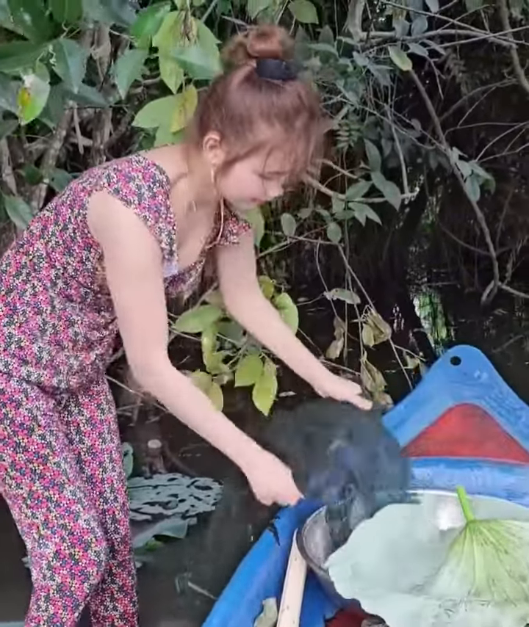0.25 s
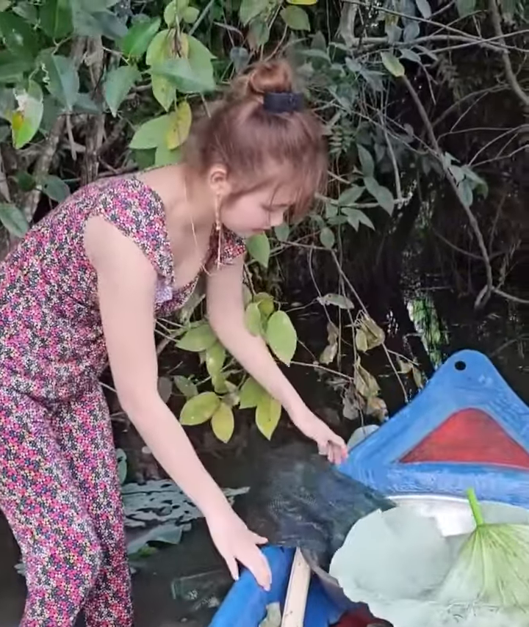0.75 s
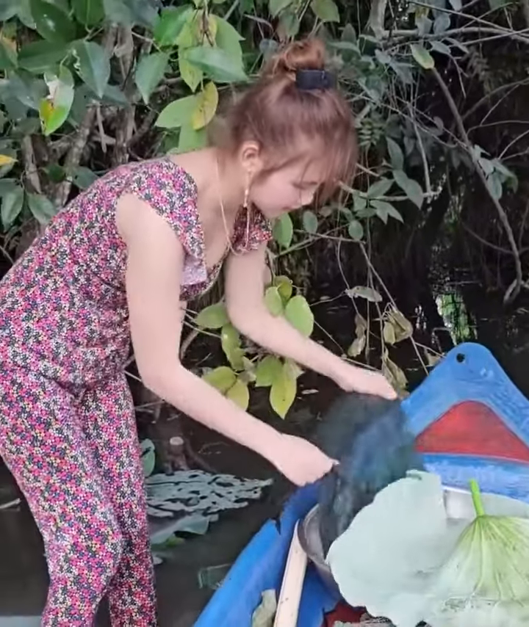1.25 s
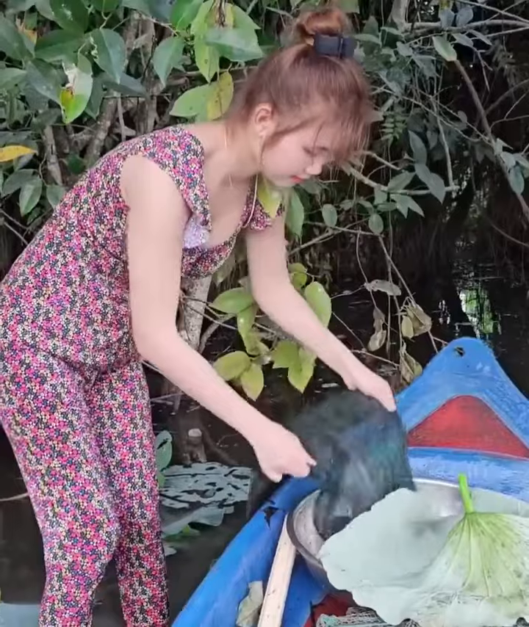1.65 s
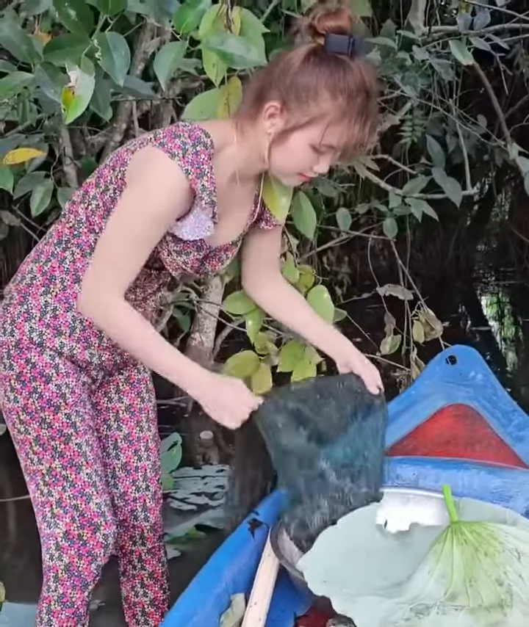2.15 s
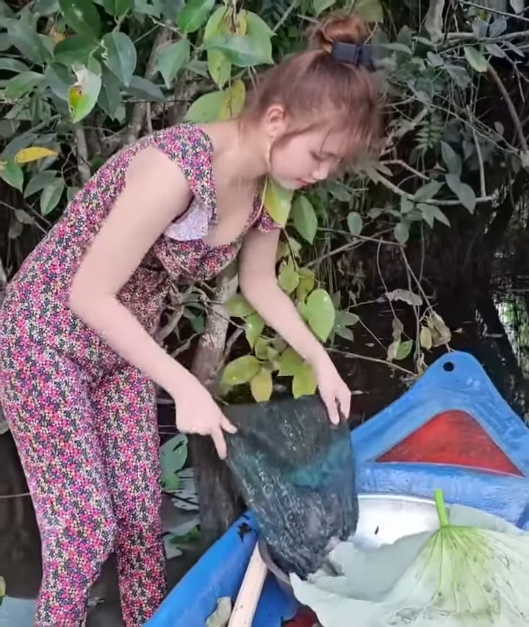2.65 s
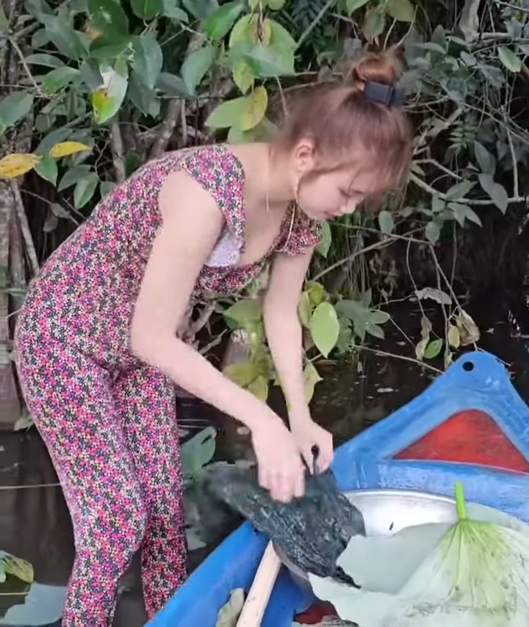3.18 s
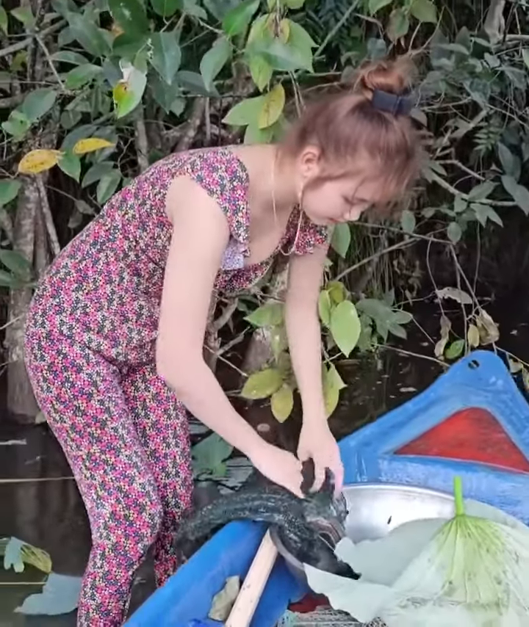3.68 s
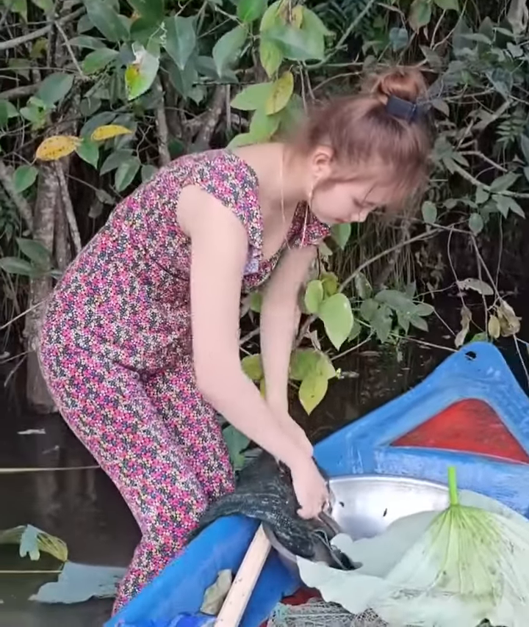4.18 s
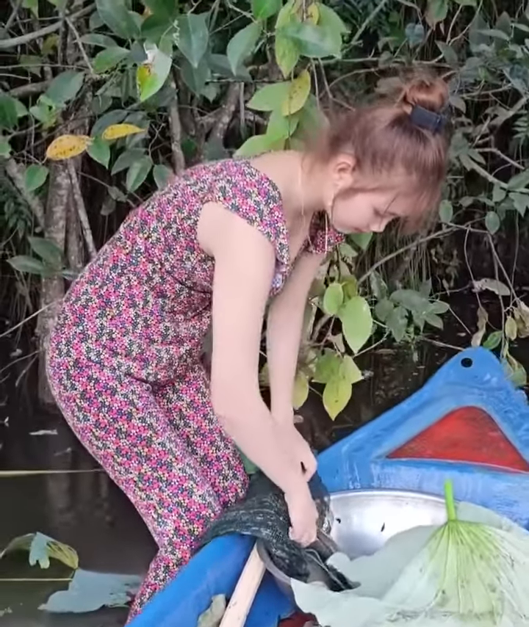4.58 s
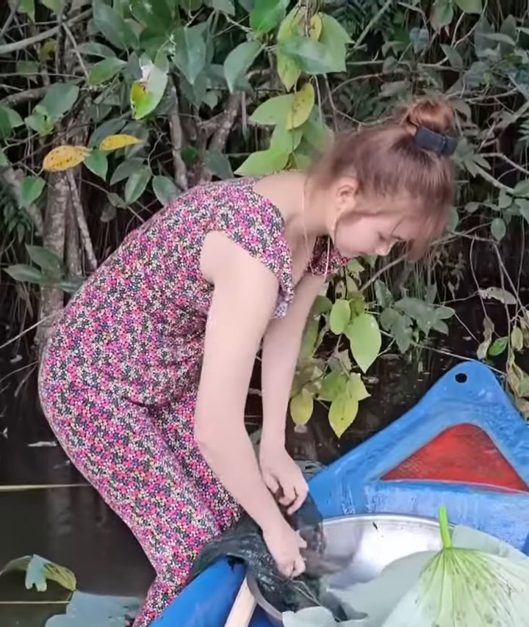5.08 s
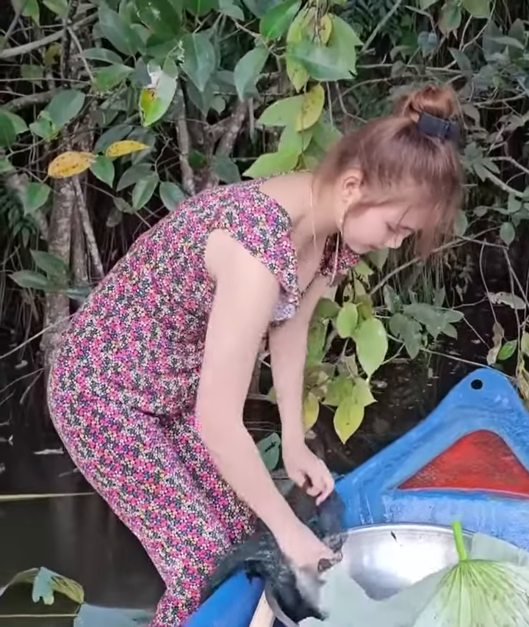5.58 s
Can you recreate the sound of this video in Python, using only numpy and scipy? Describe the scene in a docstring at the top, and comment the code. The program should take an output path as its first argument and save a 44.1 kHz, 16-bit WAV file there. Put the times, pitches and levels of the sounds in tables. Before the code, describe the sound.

Close, dry stereo sound outdoors in a swamp. A thin, shrill insect chorus around 8 to 9 kHz and a far low rumble run throughout, the rumble swelling as the boat lurches. From 0 s a wet net scrapes over a plastic hull with grainy rustle, drips and fizz. Quick wet slaps clank in a metal basin from 0.1 s, with a hollow thump at 0.4 and a cluster peaking at 0.7 s, leaving thin ringing. Strong slaps follow at 1.1, 1.4, 2.1 and 2.3 s among scraping tugs and dull hull knocks, the heaviest near 2.65 s. After 3 s it calms to small taps and light rustles; a lone insect sings two brief pure notes near 3.5 s. Firmer slaps come at 3.9 and 4.1 s, then a near lull. From 4.8 s slaps, rustling and thumps return, busiest around 5.0 to 5.3 s, with wet mesh movement continuing to the end.

```python
"""On a swamp, close to a small plastic boat: a far low rumble, quiet air and shrill insects run throughout.
A wet net is hauled over the side from the start: random slips ring the hull, mesh noise and drops rustle.
Weights and catch soon slap a metal basin (noise bursts and ringing modes) and thump the hull (its modes).
Thin decaying sines ring on after some knocks; past the middle a single insect twice sings a pure tone."""
import sys
import numpy as np
from scipy import signal
from scipy.io import wavfile

SR = 44100
rng = np.random.default_rng(int(sys.argv[2]) if len(sys.argv) > 2 else 0)


def master_out(mix):
    """Clip the mix to full scale and print it as 16-bit PCM to the path in sys.argv[1]."""
    frames = np.transpose(np.atleast_2d(mix))
    ceiling = np.clip(frames, -1, 1)
    pcm = np.round(ceiling * 32767).astype(np.int16)
    wavfile.write(sys.argv[1], SR, pcm)


N = 257103

# Slaps in the basin: (time [s], peak level [dB], brightest pitch [Hz], splat decay by 60 dB [s],
# left over right [dB])
SLAPS = [(0.0902, -14.5, 2880, 0.093, -13), (0.4175, -21, 2130, 0.04, -4), (0.499, -16.5, 3700, 0.34, 0),
         (0.578, -14.5, 4220, 0.1, -2), (0.6188, -16.5, 2190, 0.037, -2), (0.6455, -15.5, 1400, 0.16, -2),
         (0.647, -17.5, 4100, 0.28, 0), (0.7125, -5.5, 4340, 0.16, -1), (1.1155, -5.5, 2690, 0.027, 5),
         (1.12, -18.5, 4750, 0.058, -15), (1.36, -9, 3500, 0.11, -1), (1.679, -23, 1400, 0.044, 2),
         (1.738, -22, 3150, 0.15, 3), (2.058, -7, 3080, 0.068, -4), (2.1, -16, 2880, 0.033, 4),
         (2.113, -11, 2900, 0.25, 9), (2.26, -7.5, 2740, 0.057, -1), (2.3125, -12.5, 4130, 0.19, 0.5),
         (2.481, -20, 1290, 0.068, 2), (2.75, -26, 1670, .04, 9), (2.959, -23, 3750, 0.17, 6),
         (3.302, -26, 3500, .03, 3), (3.3446, -19, 2930, 0.091, -1), (3.426, -27.5, 3930, 0.51, 6),
         (3.5248, -22.5, 2020, 0.089, 7), (3.668, -22.5, 3140, 0.06, 3), (3.9299, -10, 2110, 0.03, 0),
         (3.937, -28, 3700, 0.1, -1), (4.1015, -15, 2120, 0.046, 3), (4.102, -18.5, 3100, 0.11, 6),
         (4.14, -24, 1730, 0.099, 0), (4.835, -42, 3500, 0.055, 5), (4.851, -24.5, 1420, 0.091, 0),
         (4.96, -14.5, 3140, 0.081, 2), (5.003, -10.5, 3750, 0.038, 10), (5.0055, -9.5, 3400, 0.065, 0),
         (5.154, -19, 1390, 0.051, 6), (5.228, -11.5, 3280, 0.022, 4), (5.273, -25, 3320, .05, 4),
         (5.453, -20, 3350, 0.046, 7), (5.591, -20, 2100, 0.032, 4)]
# Modes of the plastic hull: (frequency [Hz], level [dB], free decay by 60 dB [s])
HULL = [(74.5, 1, 0.28), (149.6, 8, 0.25), (242, 15.5, 0.15), (309, -7.5, 0.69), (381, -3, 0.22),
        (500, -3, 0.66), (673, 9.5, 0.16), (840, 10, 0.074), (1078, 3, 0.12), (1297, 9.5, 0.14),
        (1443, 10, 0.15), (1920, 6, 0.05)]


def from_db(db):
    """Gain of a level in dB."""
    return 10 ** (np.asarray(db) / 20)


def rms_one(x):
    """Scaled to rms 1."""
    return x / np.sqrt(np.mean(x ** 2) + 1e-20)


def in_time(rows):
    """Each column after the time, as a value per sample."""
    s, *columns = np.transpose(rows)
    return [np.interp(np.arange(N) / SR, s, column) for column in columns]


def at_hz(points, hz):
    """A spectrum read on a log-frequency axis."""
    points = np.array(points)
    return np.interp(np.log(hz), np.log(points[:, 0]), points[:, 1])


def drift(rate):
    """Slow random wander of rms 1: low-passed noise at a 40th of the sample rate, faster with rate."""
    r = np.exp(-80 * np.pi * rate / SR)
    noise = rng.standard_normal(N // 40 + 2002)
    slow = signal.lfilter([1], [1, -2 * r, r * r], noise)[2000:]   # the filter has settled by then
    return np.interp(np.arange(N) / 40, np.arange(len(slow)), rms_one(slow))


def ring(x, hz, t60):
    """A two-pole resonance: a unit click sets a decaying sine of height 1 ringing."""
    r, w = from_db(-60 / (t60 * SR)), 2 * np.pi * hz / SR
    return signal.lfilter([0, np.sin(w)], [1, -2 * r * np.cos(w), r * r], x + 1e-18)


def stereo(pair, hz):
    """Two unrelated signals mixed to left and right as alike as the microphones hear that pitch."""
    # (frequency [Hz], left-right likeness [0-1])
    likeness = [(60, 1), (250, 0.97), (500, 0.8), (1000, 0.64), (2000, 0.25), (4000, 0.0079), (12000, 0.23)]
    alike = np.clip(at_hz(likeness, hz), 0, 1)
    mid = np.sqrt(1 + alike) * pair[0]
    side = np.sqrt(1 - alike) * pair[1]
    return (mid + side * [[1], [-1]]) / np.sqrt(2)


def grains(per_s, spread_db):
    """Two trains of clicks at shared random moments, uneven in size; rms 1."""
    sizes = from_db(spread_db * np.minimum(rng.exponential(1, N), 5))
    struck = rng.random(N) < per_s / SR
    return rms_one(sizes * struck * rng.standard_normal((2, N)))


def coloured(pair, spectrum, patchy_db):
    """A bank of half-octave bands, each with its level, flicker and likeness; rms 1."""
    low_hz, high_hz = spectrum[0][0], min(spectrum[-1][0], .45 * SR)
    edges = np.geomspace(low_hz, high_hz, 2 + int(2 * np.log2(high_hz / low_hz)))
    out = 0
    for k, (low, high) in enumerate(zip(edges, edges[1:])):
        band_filter = signal.butter(2, [low, high], "band", fs=SR, output="sos")
        band = signal.sosfilt(band_filter, pair)
        hz = np.sqrt(low * high)
        gain = from_db(at_hz(spectrum, hz) + patchy_db * drift(12.0))
        out = out + (-1) ** k * gain * stereo(band, hz)
    return rms_one(out)


def body(pair, modes):
    """The modes of an object rung in parallel; rms 1."""
    return rms_one(sum(from_db(db) * stereo(ring(pair, hz, t60), hz) for hz, db, t60 in modes))


def blow(modes, hz, length, slope_db, stretch):
    """Modes rung by one short rattling contact, favouring those near the pitch of the spot struck; peak 1."""
    contact = .08 * rng.standard_normal((2, length)) * np.exp(-np.arange(length) / (.005 * SR))
    # the second path to the microphones is a little longer
    contact[0, 0], contact[1, rng.integers(2, 30)] = 1, 1
    # load and spot change every mode a little
    chance = np.clip(rng.normal(0, 1, (len(modes), 2)), -1.5, 1.5)
    scatter_db, detune = 2, .02
    rung = 0
    for (f, db, t60), (c, d) in zip(modes, chance):
        level_db = db - slope_db * abs(np.log2(f / hz)) + scatter_db * c   # slope in dB per octave
        mode = stereo(ring(contact, f * (1 + detune * d), t60 * stretch), f)
        rung = rung + from_db(level_db) * np.sign(d) * mode   # random polarity
    return rung / np.abs(rung).max()


def rumble():
    """A steady far rumble of low noise that swells quickly and sinks slowly as the boat lurches."""
    # (frequency [Hz], relative density [dB per Hz])
    rumble_spectrum = [(12, -58), (20, -44), (37, -4.5), (50, 3), (68, 3), (103, -1), (165, -14.5),
                       (199, -11.5), (275, -19), (320, -26), (420, -72), (700, -120)]
    # Lurches of the boat: (time of the crest [s], level [dB])
    lurches = [(0.02, -22), (0.62, -23.5), (1.0, -26.5), (1.39, -19.5), (1.61, -33), (1.95, -47),
               (2.15, -21), (2.49, -20.5), (2.59, -19), (2.66, -21), (2.998, -27.5), (4.56, -29),
               (4.971, -21), (5.33, -24), (5.46, -22.5), (5.8, -33)]
    steady_db, rise_s, fall_s = -32.5, 0.023, 0.068
    power, t = from_db(steady_db) ** 2, np.arange(N) / SR
    for s, db in lurches:
        swell = np.exp(-np.maximum((s - t) / rise_s, (t - s) / fall_s))
        power = power + (from_db(db) * swell) ** 2
    return np.sqrt(power) * coloured(rng.standard_normal((2, N)), rumble_spectrum, patchy_db=1.5)


def quiet_air():
    """The quiet of the swamp: steady faint noise whose bands flicker."""
    # (frequency [Hz], relative density [dB per Hz])
    air_spectrum = [(150, 8), (250, -31), (330, -37), (500, -24), (2000, -37), (4000, -25), (5800, -24),
                    (7200, 22), (9360, -45), (15800, -80)]
    return from_db(-59) * coloured(rng.standard_normal((2, N)), air_spectrum, patchy_db=3.0)


def insects(chorus_db):
    """Fluttering noise excites short shell resonances as a chorus; a pure sine stands for a lone singer."""
    # Shell resonances in the bushes: (frequency [Hz], relative level [dB], decay by 60 dB [s])
    shells = [(7640, 11, 0.019), (7947, 26.5, 0.03), (8144, 27, 0.031), (8450, 32.5, 0.0096),
              (8820, 30.5, 0.013), (8987, 22, 0.012)]
    # Pure singers: (time [s], length [s], frequency [Hz], level [dB])
    solos = [(3.44, .14, 8786, -40), (3.6, .16, 8786, -46)]
    solo_edge_s = .01
    wings = rng.standard_normal((2, N)) * from_db(0.8 * drift(45))
    pairs = 0
    for k, (hz, db, t60) in enumerate(shells):
        pairs = pairs + (-1) ** k * from_db(db + 1.2 * drift(3.0)) * ring(wings, hz, t60)
    narrow = signal.cheby1(5, 1, [7620, 9020], "band", fs=SR, output="sos")
    mid, side = signal.sosfilt(narrow, pairs)
    chorus = from_db(chorus_db) * rms_one(mid + 0.61 * side * [[1], [-1]])
    t = np.arange(N) / SR
    singers = 0
    for s, length, hz, db in solos:
        edges = np.clip(np.minimum(t - s, s + length - t) / solo_edge_s, 0, 1)
        singers = singers + from_db(db) * edges * np.sin(2 * np.pi * hz * t)
    return chorus + singers


def haul():
    """Knots slip over the hull and ring it; strands rustle, drops ping and the water fizzes."""
    # Spectra of scraping, rustling and fizzing: (frequency [Hz], relative density [dB per Hz])
    scrape_spectrum = [(71, -22), (120, -0.5), (381, -8.5), (599, 1), (668, -12), (1020, -3), (1460, -15.5),
                       (1630, -12), (5000, -27), (6500, -62), (11000, -120)]
    rustle_spectrum = [(410, -40), (700, -5), (1400, 1.5), (2000, 6.5), (3200, 11), (4500, 7.5),
                       (6770, 5.5), (10000, -4.5), (13000, -50), (22000, -120)]
    fizz_spectrum = [(5290, -49), (9000, -37), (10400, 13), (11700, 15), (15200, 10.5), (16300, -6)]
    net_lean_db = 1   # left over right of the mesh, beyond the lean of the hull
    scrape_gain, rustle_gain, fizz_gain = effort()
    slips = grains(4000, spread_db=.5)
    scrape = 0.82 * coloured(slips, scrape_spectrum, patchy_db=4.0) + 0.43 * body(slips, HULL)
    strands = rng.standard_normal((2, N)) * from_db(0.4 * drift(49))   # strands let go in clumps
    drops = .75 * droplets(1500, 70.0, rustle_spectrum)
    crackle = .6 * grains(900, spread_db=-1.0)   # wet knots snapping free
    rustle = 1.15 * coloured(strands + crackle, rustle_spectrum, patchy_db=3.0) + drops
    fizz = coloured(strands, fizz_spectrum, patchy_db=2.0)
    mesh = rustle_gain * rustle + fizz_gain * fizz
    return scrape_gain * scrape + mesh * from_db([[net_lean_db / 2], [-net_lean_db / 2]])


def effort():
    """Gains of scrape, rustle and fizz: tugs and shaking slaps swell, sag and fade over steady hauling."""
    # Steady hauling: (time [s], drag of the net [dB], wetness: fizz against rustle [dB])
    pull = [(0.0, -27.5, -3.5), (0.35, -40.5, -9), (0.9, -45.5, -13), (1.3, -34.5, -10.5),
            (2.2, -36.5, -6.5), (2.7, -35.5, -14.5), (3.0, -47.5, -8), (3.8, -49.5, -15.5), (4.4, -57, -19),
            (4.82, -56.5, -9), (5.07, -49.5, -5), (5.83, -30.5, -10)]
    # Tugs at the net, before their swell: (time [s], length [s], scrape gain [dB], rustle gain [dB])
    tug_rows = [(0, 0.066, -24, -34.5), (0.083, 0.012, -14.5, -22.5), (0.19, 0.037, -21, -36.5),
                (0.327, 0.12, -26, -26), (0.417, 0.011, -22, -16), (0.569, 0.067, -22.5, -24),
                (0.717, 0.12, -29.5, -32.5), (1.117, 0.1, -25, -30), (1.179, 0.1, -18, -32.5),
                (1.363, 0.092, -17, -28), (1.566, 0.06, -17.5, -33), (1.648, 0.08, -35, -29),
                (1.746, 0.057, -21.5, -28.5), (1.9, 0.1, -12.5, -28.5), (2.085, 0.099, -21, -22.5),
                (2.251, 0.075, -24, -28), (2.356, 0.15, -31, -28), (2.445, 0.083, -19.5, -34),
                (2.626, 0.03, -19, -29), (3.084, 0.22, -34, -41), (3.27, .03, -52, -40),
                (3.41, 0.073, -38.5, -34.5), (3.689, 0.048, -41.5, -38.5), (4.204, 0.076, -43, -50),
                (4.485, 0.062, -51, -53), (4.821, 0.087, -39.5, -31), (4.952, 0.062, -26.5, -26),
                (4.979, 0.1, -34, -29), (5.144, 0.044, -27, -27.5), (5.215, 0.067, -22.5, -21),
                (5.301, 0.063, -67, -30.5), (5.439, 0.049, -32.5, -25.5), (5.565, 0.048, -26.5, -30.5),
                (5.577, 0.048, -26.5, -26), (5.755, 0.015, -22, -32), (5.811, 0.022, -31.5, -31)]
    rustle_follows = 0.76   # share of the drag's swing
    # each slap shakes the net: scrape and rustle against its peak, at a drag of -40 dB
    spray_rise_s, spray_s, spray_db = .002, 0.027, (-23.5, -19.5)
    spray_follows = 0.22   # a net at rest shakes less: share of the drag's swing about -40 dB
    rise_share, long_tug_s = 0.3, 0.1   # rise share of a tug this long; shorter ones swell faster
    fade_s = .02
    drag_db, wet_db = in_time(pull)
    steady_rustle_db = -40.5 + rustle_follows * (drag_db + 38.5)
    power = from_db([drag_db, steady_rustle_db]) ** 2
    t = np.arange(N) / SR
    sprays = []
    for s, db, *_ in SLAPS:
        swing_db = spray_follows * (drag_db[round(s * SR)] + 40)
        sprays.append((s, spray_rise_s, spray_s, *(db + np.add(spray_db, swing_db))))
    tugs = [(s, rise_share * length ** 2 / long_tug_s, length, *dbs) for s, length, *dbs in tug_rows]
    for s, rise, length, *dbs in tugs + sprays:
        i, j = round(s * SR), round((s + length + .3) * SR)
        since = np.maximum(t[i:j] - s, 0)
        swell = 1 - np.exp(-since / rise)
        fade = np.exp(-.4 * since / length - np.maximum(since - length, 0) / fade_s)
        power[:, i:j] += (from_db(dbs)[:, None] * (swell * fade)) ** 2
    scrape, rustle = np.sqrt(power)
    return scrape, rustle, rustle * from_db(wet_db)


def droplets(per_s, cycles, spectrum):
    """Drops and tiny bubbles, each ringing at one of 18 pitches, down 60 dB after some cycles; rms 1."""
    clicks = grains(per_s, spread_db=2.3)
    dealt = rng.integers(0, 18, N)   # which pitch a click at this sample rings
    out = 0
    for k, hz in enumerate(np.geomspace(800, 9000, 18)):
        pings = stereo(ring(clicks * (dealt == k), hz, cycles / hz), hz)
        out = out + from_db(at_hz(spectrum, hz)) * np.sqrt(hz) * pings
    return rms_one(out)


def slaps():
    """A wet splat of dying noise, plus the basin modes, strongest near its pitch."""
    # Modes of the metal basin: (frequency [Hz], level [dB], decay by 60 dB before each slap's stretch [s])
    basin = [(1300, 5, 0.05), (1450, 8, 0.08), (2080, 9, 0.07), (2380, 1, 0.045), (2900, 4, 0.06),
             (3230, 9, 0.07), (3700, 7, 0.06), (3910, 9, 0.08), (4200, 11, 0.08), (4550, 5, 0.07),
             (5150, -2, 0.06), (6400, -2, 0.06)]
    rise_s = .0006   # wet contact is not instant
    width = 1.9   # the splat spans this factor either side of its pitch
    out, t = np.zeros((2, N + SR)), np.arange(SR // 5) / SR
    for s, db, hz, t60, pan_db in SLAPS:
        noise = rng.standard_normal((2, len(t)))
        rung = blow(basin, hz, len(t), slope_db=17.0, stretch=t60 / .22)
        wide = signal.butter(2, [hz / width, hz * width], "band", fs=SR, output="sos")
        splat = stereo(signal.sosfilt(wide, noise) + 0.15 * noise, hz) * from_db(-60 * t / t60)
        slap = 0.58 * rung + 0.48 * splat / np.abs(splat).max()
        slap = slap * (1 - np.exp(-t / rise_s))
        slap = slap / np.abs(slap.mean(axis=0)).max()   # peak 1 in the mean of left and right
        i = round(s * SR)
        out[:, i:i + len(t)] += from_db(db + np.array([[.5], [-.5]]) * pan_db) * slap
    return out[:, :N]


def thumps():
    """A soft blow rings the hull modes, damped to half their free decay time."""
    # Thumps on the hull: (time [s], level [dB], strongest pitch [Hz])
    thump_rows = [(0.201, -36, 700), (0.385, -27, 673), (0.42, -8, 680), (0.537, -12, 228),
                  (1.378, -10, 198), (1.571, -20, 673), (1.762, -15.5, 673), (1.911, -23, 700),
                  (2.466, -23, 314), (2.631, -15, 673), (2.636, -7, 230), (2.649, -8, 150),
                  (2.962, -23.5, 246), (3.205, -20.5, 673), (5.162, -18, 242), (5.18, -16, 840),
                  (5.228, -15.5, 680), (5.26, -14, 197), (5.446, -18, 200), (5.591, -24, 780),
                  (5.758, -39, 500), (5.764, -14, 160)]
    out, length = np.zeros((2, N + SR)), SR // 5
    soft = 1 - np.exp(-np.arange(length) / (0.00037 * SR))   # wet mesh cushions the contact
    for s, db, hz in thump_rows:
        i = round(s * SR)
        out[:, i:i + length] += from_db(db) * soft * blow(HULL, hz, length, slope_db=9.0, stretch=.5)
    return out[:, :N]


def tones():
    """Thin, unsteady partials that set in and die away, perhaps the wall of the basin."""
    # Partials that ring on after a knock: (time [s], frequency [Hz], level [dB], decay by 60 dB [s])
    partials = [(.43, 870, -36, 0.86), (0.576, 1450, -27.5, 0.18), (0.645, 1454, -16, 0.16),
                (0.643, 1045, -22, 0.23), (.646, 2104, -23, 0.17), (.716, 840, -21, 0.11),
                (.716, 1476, -34, 0.36), (0.719, 1096, -29.5, 0.38), (1.035, 852, -38, 0.72),
                (2.761, 1690, -21.5, 0.06)]
    out, t = np.zeros(N + SR), np.arange(SR // 2) / SR
    for s, hz, db, t60 in partials:
        rough = .9 + .3 * drift(50)[:len(t)]
        envelope = from_db(db - 60 * t / t60) * (1 - np.exp(-t / 0.00088))
        i = round(s * SR)
        out[i:i + len(t)] += envelope * rough * np.sin(2 * np.pi * hz * t)
    return out[:N]


def scene():
    """The work at the boat over the sounds of the swamp."""
    lean_db = 0.5   # net, hull and partials are a little left of the microphone
    at_boat = (haul() + thumps() + tones()) * from_db([[lean_db / 2], [-lean_db / 2]])
    return at_boat + slaps() + rumble() + quiet_air() + insects(chorus_db=-37.5)


def record(dry):
    """The microphone has two dull spots, peaks are rounded, the top is cut."""
    # Dull spots of the microphone: (frequency [Hz], width [Hz], depth [0-1])
    dull_spots = [(2560, 350, .75), (5900, 900, .6)]
    top, cutoff_hz = 1.5, 16450   # height at which peaks flatten; 80 dB down from the cutoff up
    for hz, width_hz, depth in dull_spots:
        dry = dry - depth * signal.lfilter(*signal.iirpeak(hz, hz / width_hz, SR), dry)
    rounded = top * np.tanh(dry / top)
    return signal.sosfilt(signal.cheby2(14, 80, cutoff_hz, fs=SR, output="sos"), rounded)


dry = scene()
out = record(dry)
master_out(out)
```